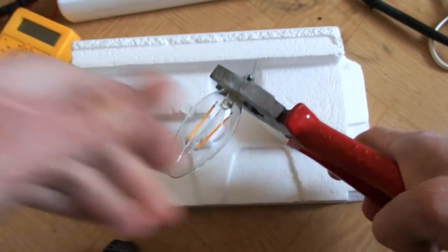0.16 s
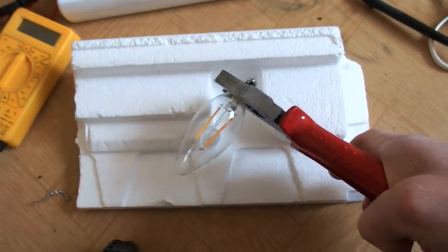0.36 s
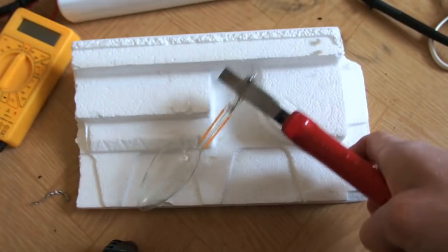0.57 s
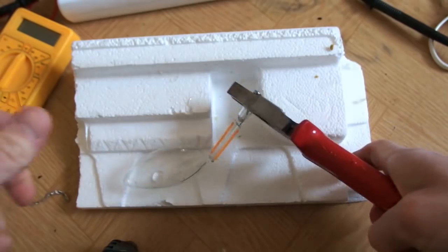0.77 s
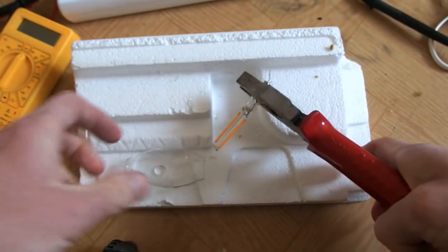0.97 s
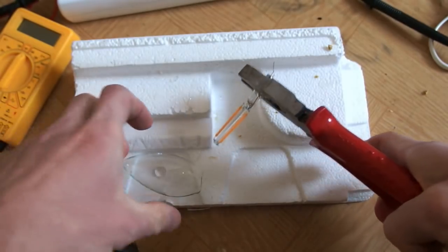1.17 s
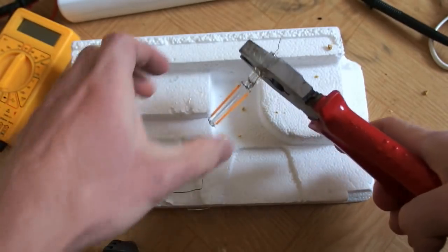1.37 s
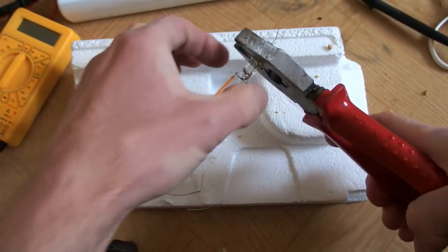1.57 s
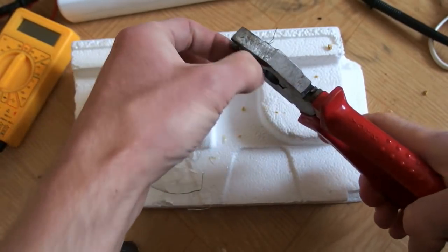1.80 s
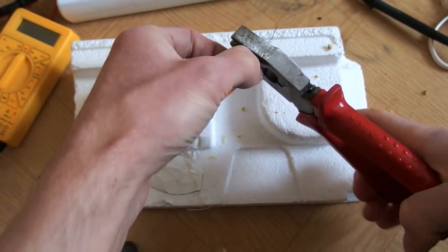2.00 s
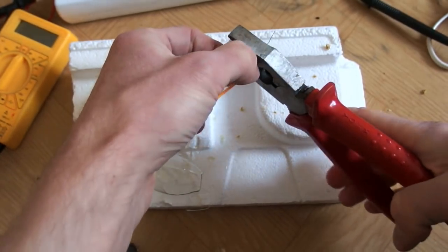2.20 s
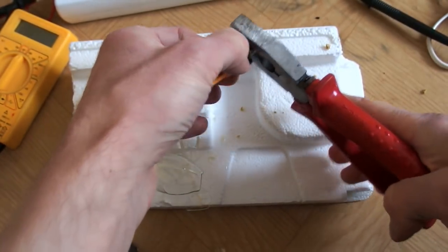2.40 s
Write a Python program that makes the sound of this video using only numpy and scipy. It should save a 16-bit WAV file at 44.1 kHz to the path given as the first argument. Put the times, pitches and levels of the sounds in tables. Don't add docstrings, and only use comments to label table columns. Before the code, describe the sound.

Thin glass bulb bursts with a sharp bright crack, shards clinking and scattering on foam

```python
import sys
import numpy as np
from scipy import signal
from scipy.fft import rfft, irfft
from scipy.io import wavfile
from scipy.ndimage import uniform_filter1d

SR = 44100
rng = np.random.default_rng(int(sys.argv[2]) if len(sys.argv) > 2 else 0)


def ratio(d):
    e = np.asarray(d, float) / 20
    return 10 ** e


def output_pcm(signal):
    pcm = np.clip(np.atleast_2d(signal).T, -1, 1) * 32767
    wavfile.write(sys.argv[1], SR, np.round(pcm).astype(np.int16))


N = 108045
BURST_S = .226
SHELF_HZ = 15600
OPPOSED = np.array([[1], [-1]])


def band(x, hz, width):
    hz = min(hz, .45 * SR)
    return signal.lfilter(*signal.iirpeak(hz, hz / min(width, .4 * SR), fs=SR), x)


def steep(x, hz, width):
    y = band(band(x, hz, width), hz, width)
    return y / y.std()


def add(out, s, db, v, pan_db=0):
    i = int(s * SR)
    v = v[:N - i] * ratio(db) / np.abs(v).max()
    out[:, i:i + len(v)] += v * ratio(np.array([[pan_db], [-pan_db]]) / 2)


def fade(t60, size=8192):
    return np.exp(-np.log(1000) * np.arange(size) / SR / max(t60, .001))


def die_away(t, start, t60):
    return (t > start) * np.exp(-np.log(1000) * np.maximum(t - start, 0) / t60)


def walk(rate):
    k = int(SR / rate)
    steps = np.repeat(rng.standard_normal(N // k + 1), k)
    return 2.14 * uniform_filter1d(uniform_filter1d(steps, k), k)[:N]


def ring(modes, spread_db=2, size=16384):
    t = np.arange(size) / SR
    chance = rng.standard_normal((len(modes), 2))
    flutter = uniform_filter1d(rng.standard_normal((len(modes), size)), 400) * 20
    out = np.zeros(size)
    for (hz, db, t60), (stray, phase), wobble in zip(modes, chance, flutter):
        level = ratio(db + spread_db * stray + 3.5 * wobble * min(hz / 8000, 1))
        out += level * np.sin(2 * np.pi * hz * t + phase) * fade(t60, size)
    return out


def snap(hz, length, broad_db, q):
    t = np.arange(4096) / SR
    envelope = (1 - np.exp(-t / .0004)) * np.exp(-t / (.5 * length))
    grains = rng.standard_normal(4096) * ratio(2 * rng.standard_normal(4096)) * envelope
    centre = np.sqrt(hz * 8000)
    spit = steep(grains, centre, min(1.6 * centre, SHELF_HZ))
    y = steep(grains, hz, hz / q) + ratio(broad_db) * spit
    return y / np.abs(y).max()


def air():
    # frequency in Hz, density in dB per Hz.
    air_colour = np.array([(30, -21), (55, -1.5), (95, -0.5), (263, -17), (1000, -22.5), (3430, -26.5),
                           (9000, -33.5), (16000, -31)])
    f = np.maximum(np.arange(N // 2 + 1) * SR / N, 1)
    colour = ratio(np.interp(np.log(f), np.log(air_colour[:, 0]), air_colour[:, 1]))
    side_share = np.interp(np.log(f), np.log([100, 1000, 8000]), [.45, .25, .6])
    spectrum = rfft(rng.standard_normal((2, N))) * colour
    mid, side = irfft(spectrum * np.array([np.ones_like(f), side_share]), N)
    hiss = (mid + side * OPPOSED) * ratio(-56) / mid.std()

    rumble_hz = 92.6
    rumble = rng.standard_normal(N) + .2 * rng.standard_normal((2, N))
    rumble = band(band(rumble, rumble_hz, 60), rumble_hz, 60) * ratio(2.5 * walk(8))

    murmur = steep(rng.standard_normal(N), 1573, 240) * ratio(-76.5 + 1.27 * walk(10.7))
    murmur = murmur + steep(rng.standard_normal(N), 890, 450) * ratio(-73.5 + walk(16))
    return murmur + hiss + rumble / rumble.std() * ratio(-68)


def thuds(out):
    # start in seconds, peak in dB, pitch in Hz, t60 in seconds.
    bench_thuds = [(.224, -35.5, 262, 0.025), (0.223, -43, 71, 0.16), (.297, -38.5, 255, 0.058),
                   (0.306, -35.5, 114.2, .3), (.385, -43.5, 232, 0.069), (.420, -44, 133, 0.062),
                   (0.531, -58.5, 282, 0.076), (.61, -56, 245, 0.089), (.852, -49.5, 248, 0.088),
                   (1.896, -37, 78, 0.092), (1.902, -39.5, 141, 0.087), (1.938, -41, 121, 0.057)]
    for s, db, hz, t60 in bench_thuds:
        wood = ring([(hz, 0, t60), (1.98 * hz, -8, 0.15 * t60)])
        add(out, s, db, wood * (1 - fade(0.011, 16384)))


def tray_body(x):
    # frequency in Hz, width in Hz, level in dB.
    tray_modes = [(1040, 190, -7.5), (1320, 18, -10), (1520, 220, 1.5), (2160, 1600, -2.5),
                  (3730, 190, -10.5)]
    return sum(ratio(db) * band(x, hz, width) for hz, width, db in tray_modes)


def knocks(out, t):
    # start in
    # seconds, peak in dB, pitch in Hz, t60 in seconds.
    tuned_hits = [(.029, -45, 513, 0.024), (.029, -45.5, 1390, 0.02), (.050, -47, 1370, .03),
                  (.088, -39.5, 538, 0.042), (.088, -42, 1330, 0.017), (.157, -46.5, 1110, 0.17),
                  (.2135, -34.5, 1900, 0.098), (.214, -35, 3070, 0.12), (.2237, -13, 3505, 0.022),
                  (.2237, -17, 3210, 0.016), (.2235, -13.5, 1850, 0.0063), (.2238, -29.5, 530, 0.01),
                  (.2262, -15.5, 1075, 0.019), (.2297, -18.5, 1375, 0.012), (.242, -37.5, 2400, 0.045),
                  (.254, -33, 804, 0.046), (.2655, -27.5, 2150, .02), (.270, -24, 1717, .04),
                  (.288, -24, 1380, 0.058), (.297, -30.5, 289, 0.073), (.3132, -24.5, 561, 0.019),
                  (.3132, -19, 1044, 0.02), (0.3134, -23.5, 803, 0.033), (.318, -27, 1482, 0.068),
                  (.33, -32.5, 700.4, 0.087), (.383, -48, 456, 0.041), (.415, -27, 1354, 0.022),
                  (.605, -42.5, 1170, .04), (.605, -43.5, 1475, 0.072), (.8425, -34, 1320, 0.033),
                  (.8477, -27, 1350, 0.016), (.8478, -34, 3900, .008), (.8525, -24, 1361, 0.038),
                  (.853, -37.5, 640, 0.018), (.854, -34, 2260, .035), (.8585, -26.5, 1186, 0.012),
                  (.866, -43, 1320, 0.021), (.883, -31, 1320, .045), (.898, -38, 1250, .02),
                  (.912, -40, 1465, .03), (.90, -44.5, 686, 0.21), (1.15, -48.5, 407, 0.15),
                  (1.156, -53, 1098, .1), (1.897, -43, 409, 0.064), (1.52, -60, 1600, 0.27),
                  (1.95, -53.5, 1610, .2), (2.153, -51, 976, 0.062), (2.328, -49, 1190, 0.05),
                  (2.349, -51, 1576, 0.12)]
    for s, db, hz, t60 in tuned_hits:
        push = rng.standard_normal(8192) * fade(.6 * t60) * (1 - fade(.004))
        tone = np.sin(2 * np.pi * hz * t[:8192]) * fade(t60) * (1 - fade(3 / hz))
        own = tone / tone.std() + ratio(-7) * steep(push, hz, hz / 3.5)
        shared = tray_body(band(push, hz, 2 * hz)) + .3 * band(push, .6 * hz, hz)
        add(out, s, db, own / own.std() + ratio(-8) * shared / shared.std())


def debris(t):
    crumbs = (rng.random(N) < .03) * rng.standard_normal(N)
    rattle = tray_body(crumbs * ratio(2 * walk(60)))
    rattle = rattle / rattle.std() * ratio(-35) * die_away(t, .23, .98)
    crumbs = (rng.random(N) < .05) * rng.standard_normal(N)
    second = steep(crumbs * ratio(2 * walk(79.9)), 2600, 5100)
    return rattle + second * ratio(-48) * die_away(t, .848, .51)


def nips(out):
    # start in seconds, peak in dB, pitch in Hz, length in seconds.
    stem_nips = [(1.372, -47, 11500, 0.0046), (1.654, -52, 6940, 0.0036), (1.814, -48, 10600, 0.0013),
                 (1.818, -43.5, 6700, 0.005), (1.833, -45, 13900, 0.0044), (1.8609, -39, 7040, 0.0059),
                 (1.864, -34.5, 7130, 0.0064), (1.867, -39, 8500, .004), (1.897, -46.5, 1970, 0.0093),
                 (2.154, -46.5, 5360, 0.0031), (2.155, -52, 9000, 0.014), (2.187, -48.5, 5530, .006),
                 (2.191, -50, 5930, 0.0082), (2.206, -45.5, 6600, 0.0059), (2.241, -52, 8000, 0.0027),
                 (2.299, -46, 10500, .002), (2.307, -49, 3950, 0.019), (2.310, -41, 6260, 0.026),
                 (2.312, -44, 9070, 0.016), (2.341, -40, 6000, 0.0061), (2.3446, -27.5, 7020, 0.0049),
                 (2.346, -57, 13500, .005), (2.358, -35, 6960, 0.0054), (2.368, -50, 6500, 0.053)]
    for s, db, hz, length in stem_nips:
        add(out, s, db, snap(hz, length, 0, 5), -2)


def rubbing(t):
    # start in seconds, length in seconds.
    rubs = [
        (.026, .07),
        (.66, .08),
        (1.81, .13),
        (2.15, .08),
        (2.30, .11),
    ]
    rub_levels = [-53.5, -57.5, -59, -63.5, -61.5]
    env = np.zeros(N)
    for (s, length), db in zip(rubs, rub_levels):
        env += ratio(db) * np.sin(np.pi * np.clip((t - s) / length, 0, 1))
    grain = rng.standard_normal(N) * ratio(3 * walk(150))
    rub = band(grain, 4600, 3300) + 1.5 * band(grain, 1800, 1200) + .5 * band(grain, 10000, 4000)
    return env * rub / rub.std()


def squeak(t):
    start, end = 2.272, 2.343
    u = np.clip((t - start) / (end - start), 0, 1)
    hz = 10800 + (11350 - 10800) * u + 90 * walk(500)
    return np.sin(2 * np.pi * np.cumsum(hz) / SR) * ratio(-53 + 2 * walk(150)) * u ** 0.76 * (u < 1)


def grit(t):
    # frequency in Hz, level in dB, t60 in seconds.
    grit_bands = [(1940, -8, 1), (3900, -4, 1), (6000, -8, 0.62), (9400, -7, 0.91), (13500, 11, 0.12)]
    grains_per_s = 2300
    out = np.zeros((2, N))
    clusters = ratio(2.5 * walk(70))
    for hz, db, t60 in grit_bands:
        hit = (rng.random((2, N)) < grains_per_s / SR) * rng.standard_normal((2, N)) * clusters
        mid, side = band(hit, hz, 0.35 * hz)
        wide = mid + min(hz / 25000, 1) * side * OPPOSED
        out += ratio(db - 35) * die_away(t, BURST_S, t60) * wide / mid.std()
    return out


def ringing_pieces(out):
    # start in seconds, peak in dB.
    curved_hits = [
        (.361, -29),
        (.400, -47),
        (.441, -31.5),
        (.492, -64),
    ]
    piece_hits = [
        (.8475, -20),
        (.902, -24.5),
    ]
    # frequency in Hz, level in dB, t60 in seconds.
    curved_modes = [(8995, -24, .2), (13850, -15, .1), (14830, 0, .065), (14900, -6, .05)]
    piece_modes = [(7970, -15, 0.2), (8040, -25, 0.12), (8960, -12, 0.19), (8600, -14, .09),
                   (12870, -12, 0.035), (13280, -1.5, 0.063), (13500, -4, .1), (13760, -14, .05),
                   (13850, -8, 0.083), (14300, -19, .04)]
    for hits, modes, click in ((curved_hits, curved_modes, .6), (piece_hits, piece_modes, 3.5)):
        for s, db in hits:
            r = ring(modes)
            r[:4096] += click * snap(12500, .004, 6, 2)
            add(out, s, db, r, .8)


def shards(out):
    # start in seconds, peak in dB, pitch in Hz.
    shard_hits = [(0.347, -26.5, 11800), (0.3522, -37, 14140), (0.381, -28, 6400), (0.386, -24, 4180),
                  (0.3895, -20.5, 11200), (0.4002, -15.5, 14300), (0.4392, -25, 14600), (0.4907, -41, 3100),
                  (0.523, -38, 3540), (0.5297, -34.5, 10600), (0.533, -35.5, 4750), (0.5759, -38, 4500),
                  (0.5895, -44, 3060), (0.606, -44, 3630), (0.6426, -40, 2830), (0.6775, -37.5, 2810),
                  (0.7125, -41, 2920), (0.7663, -52, 4970)]
    for s, db, hz in shard_hits:
        add(out, s, db - 3, snap(hz, .003, 2, 6), rng.standard_normal())


def ticks(out):
    # start in seconds, peak in dB.
    jaw_ticks = [
        (.0362, -34),
        (.042, -31),
        (.0502, -29),
        (.0695, -25),
        (.086, -42),
    ]
    # frequency in Hz, level in dB, t60 in seconds.
    bulb_modes = [(4500, -13, .02), (6500, -13, .012), (10650, -1, .02), (11100, 0, .02), (11550, -5, .012),
                  (12800, -6, .014), (14250, -3, .016), (15500, -7, .014), (10680, -27, .1),
                  (11090, -29, .12), (14070, -29, .07)]
    for s, db in jaw_ticks:
        r = ring(bulb_modes)
        r[:4096] += 1.5 * snap(5500, .002, 3, 2)
        r[130:] += .5 * r[:-130]
        add(out, s, db, r, -.8)


def cracks(out):
    # start in seconds, peak in dB, pitch in Hz, length in seconds.
    crack_runs = [
        (0.2209, -24, 9100, 0.0036),
        (0.2234, -15, 6400, 0.0018),
        (.2238, -8.5, 13500, 0.0072),
        (0.226, -15.5, 6400, 0.0087),
        (0.2294, -12, 7670, 0.0059),
        (.2300, -16.5, 12800, 0.0079),
        (0.241, -25, 10500, 0.0069),
        (0.27, -18.5, 12800, 0.015),
        (0.2975, -23.5, 12300, .005),
        (0.2955, -24.5, 3220, .005),
    ]
    for s, db, hz, length in crack_runs:
        add(out, s, db, snap(hz, length, 3, 8))


def room(x):
    size = 24000
    n = rng.standard_normal((3, size))
    n = 2.0 * n[0] + .5 * n[1:]
    low = signal.lfilter([.3], [1, -.7], n)
    tail = low * fade(0.48, size) + .5 * (n - low) * fade(0.27, size)
    tail = tail * (1 - fade(0.0067, size))
    tail = tail / np.sqrt((tail ** 2).sum(axis=1, keepdims=True))
    return signal.fftconvolve(x.mean(axis=0, keepdims=True), tail, axes=1)[:, :N]


def scatter(x):
    echo = steep(rng.standard_normal(2048), 10400, 12000) * fade(.05, 2048)
    echo = echo / np.sqrt((echo ** 2).sum())
    return ratio(-9.5) * signal.fftconvolve(x.mean(axis=0), echo)[:N] * OPPOSED


def scene():
    t = np.arange(N) / SR
    near = debris(t) + rubbing(t) + squeak(t) + grit(t)
    thuds(near)
    knocks(near, t)
    nips(near)
    ringing_pieces(near)
    shards(near)
    ticks(near)
    cracks(near)
    hold_until_s, recover_s = .84, .2
    duck_db = -5.5 * (t > BURST_S) * np.exp(-np.maximum(t - hold_until_s, 0) / recover_s)
    return near + scatter(near) + ratio(-9.5) * room(near) + air() * ratio(duck_db)


def top_cut(x):
    return signal.sosfilt(signal.butter(12, 16810, fs=SR, output="sos"), x)


def record(dry):
    shelf = signal.ellip(10, .2, 50, SHELF_HZ, fs=SR, output="sos")
    low = signal.sosfiltfilt(shelf, dry)
    top = dry - low
    busy = uniform_filter1d(top ** 2, size=512) + 1e-18
    opening = busy / (busy + ratio(2 * -51.5))
    limit = signal.ellip(6, .2, 50, 16600, fs=SR, output="sos")
    mix = signal.sosfiltfilt(limit, low + ratio(-25) * top * opening)
    return top_cut(mix)


dry = scene()
out = record(dry)
output_pcm(out)
```